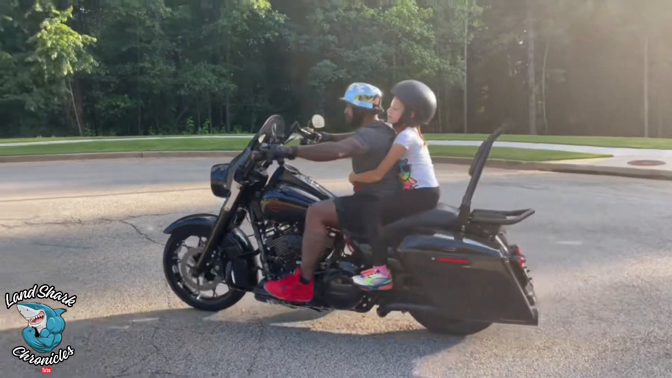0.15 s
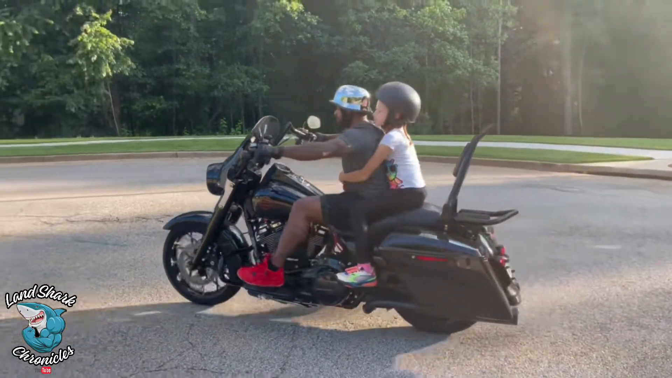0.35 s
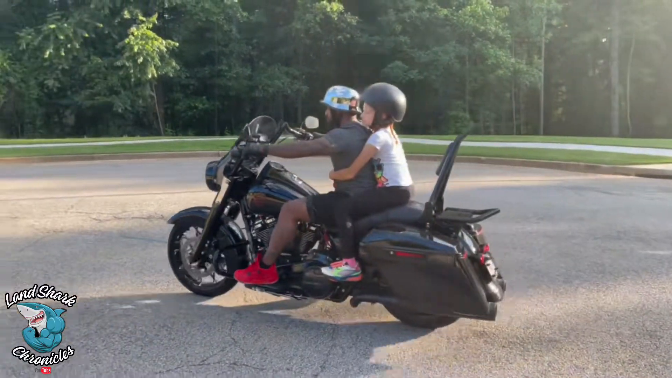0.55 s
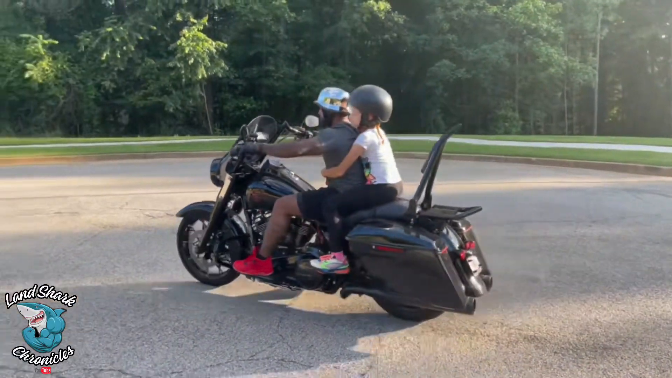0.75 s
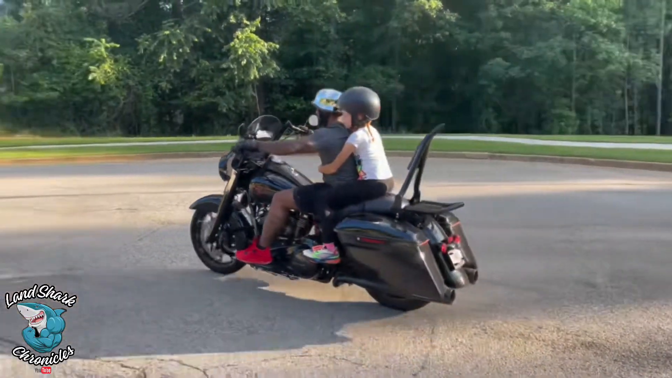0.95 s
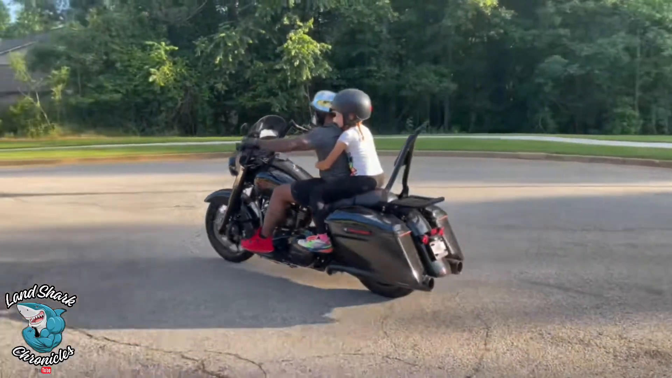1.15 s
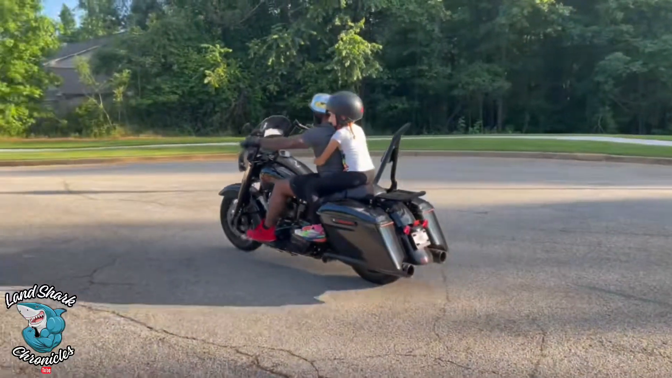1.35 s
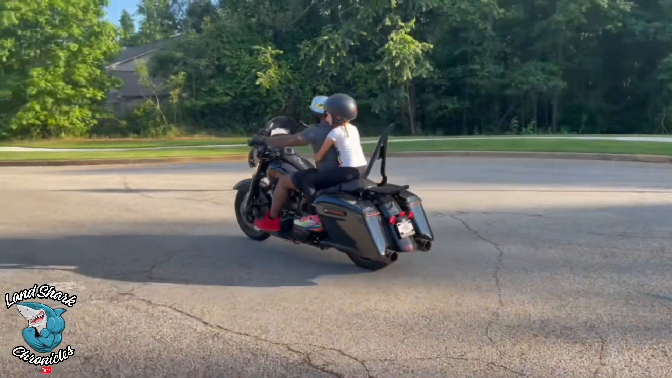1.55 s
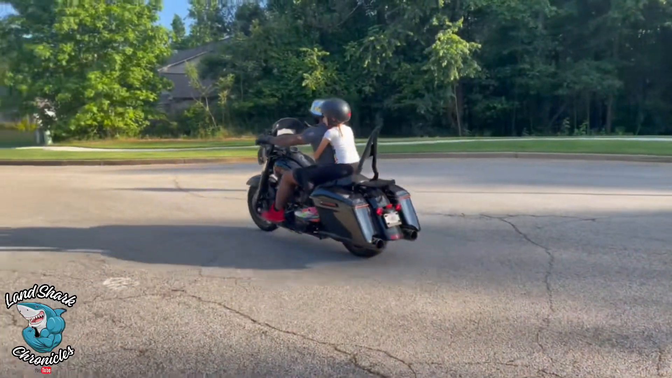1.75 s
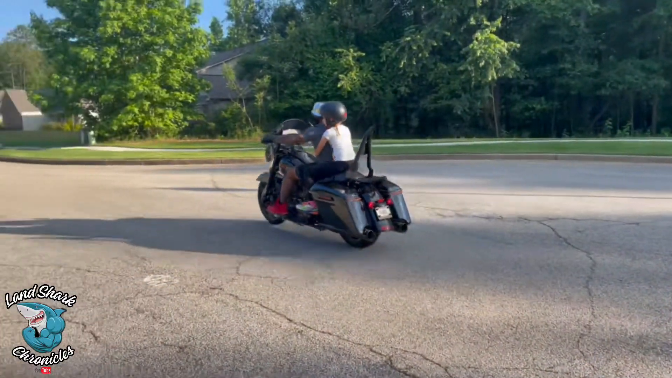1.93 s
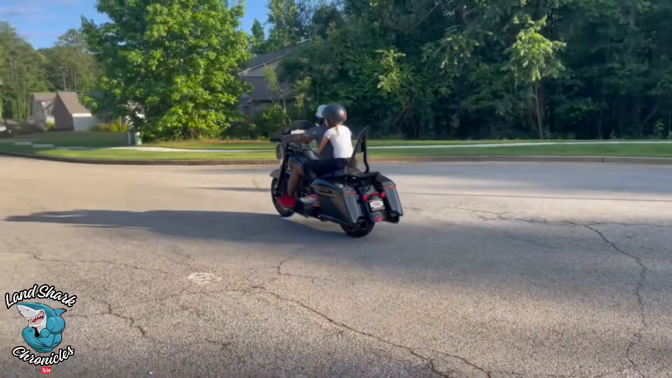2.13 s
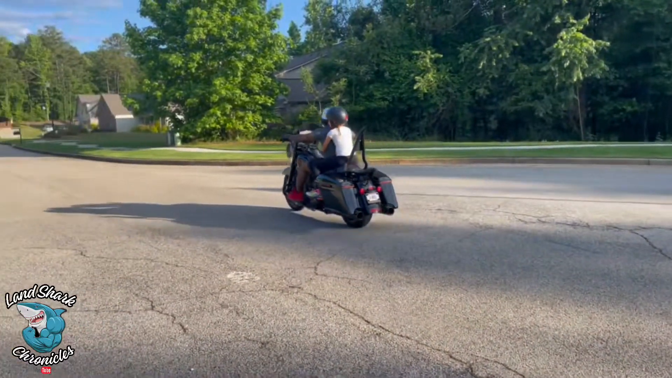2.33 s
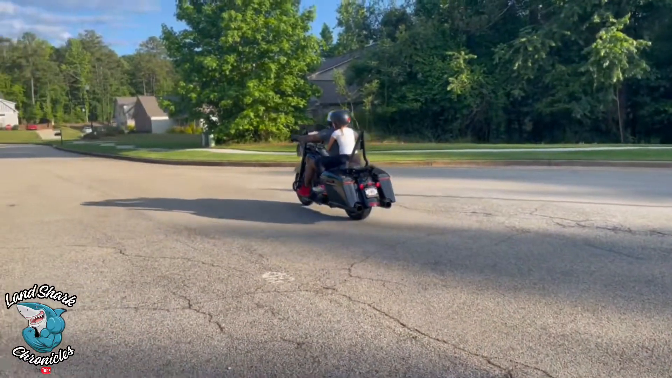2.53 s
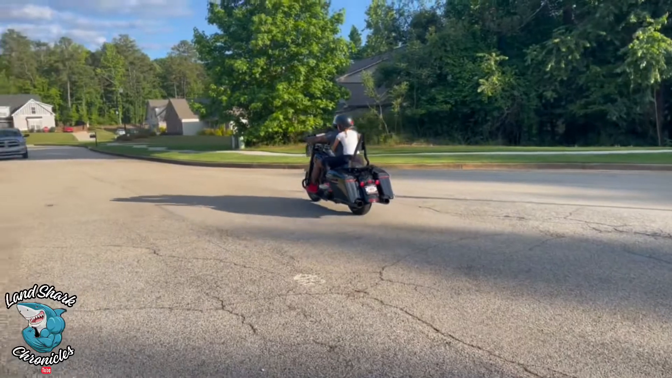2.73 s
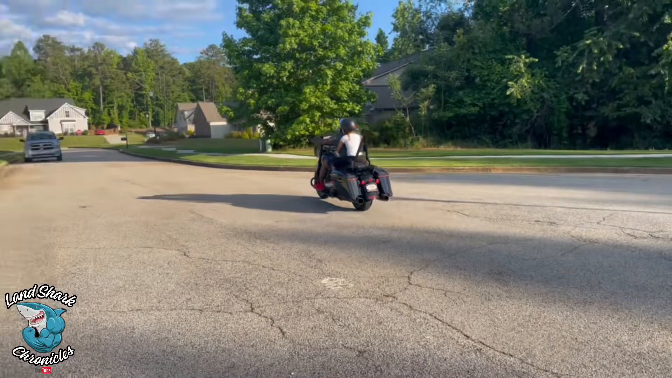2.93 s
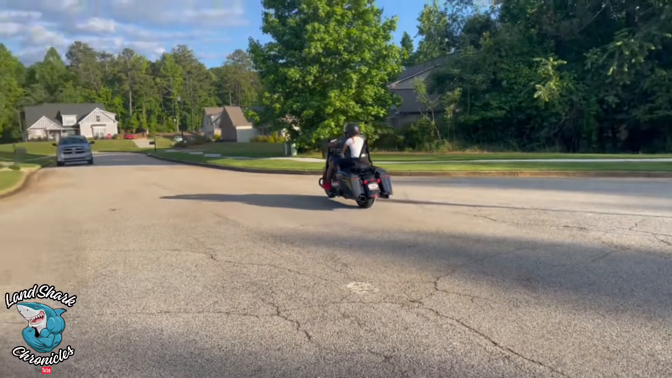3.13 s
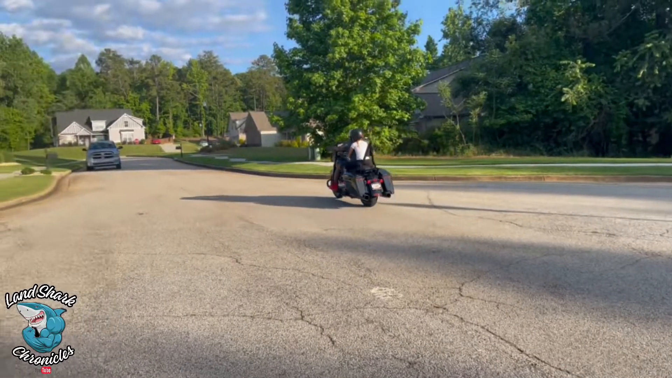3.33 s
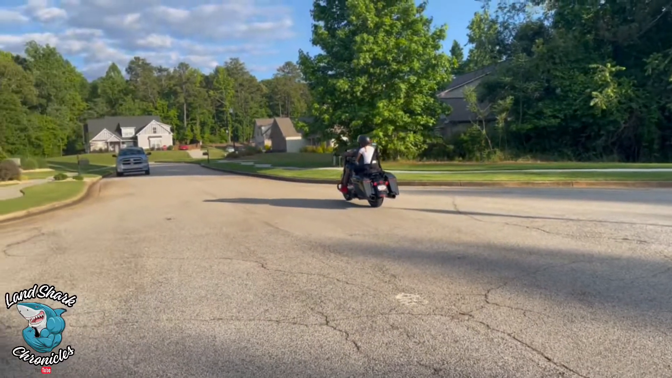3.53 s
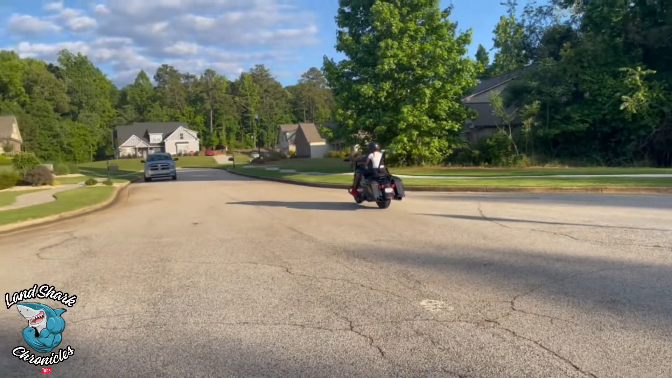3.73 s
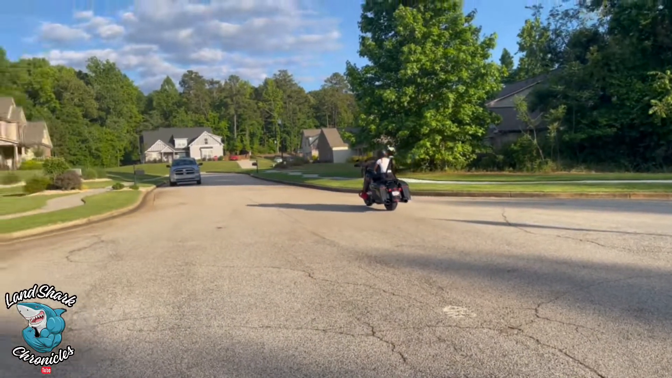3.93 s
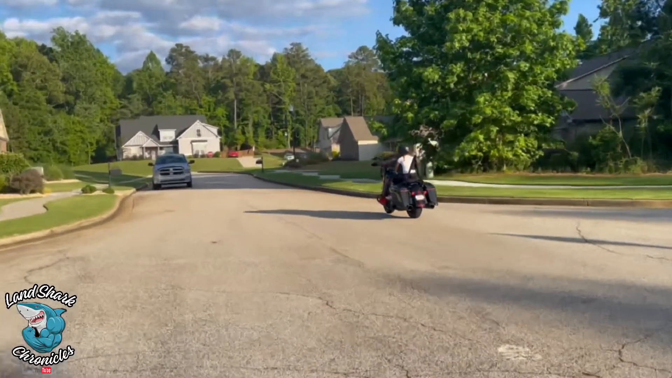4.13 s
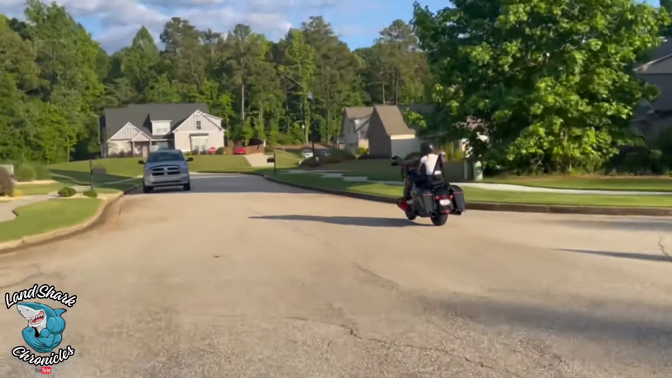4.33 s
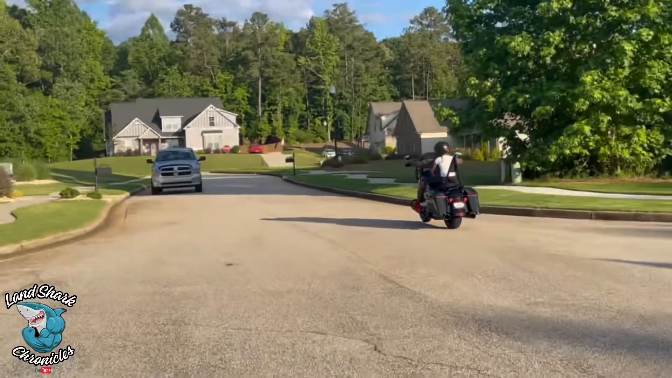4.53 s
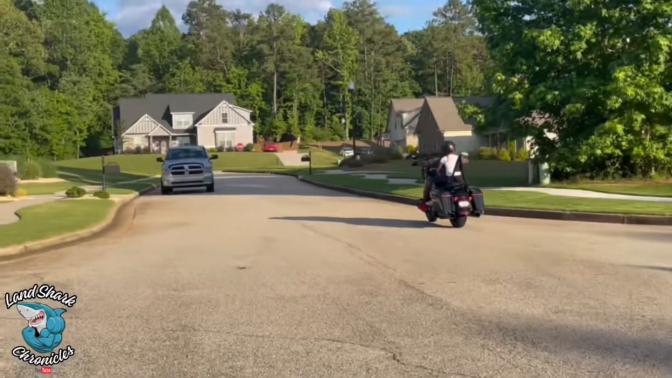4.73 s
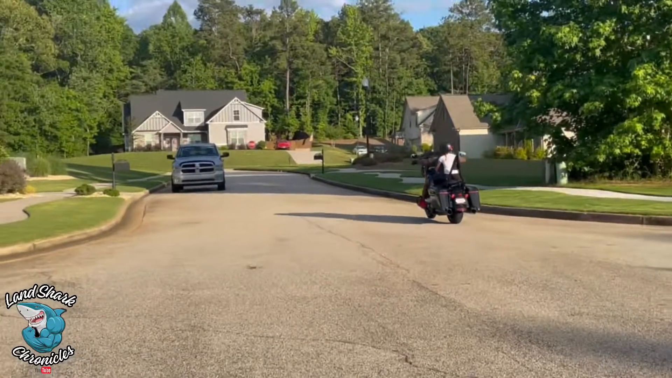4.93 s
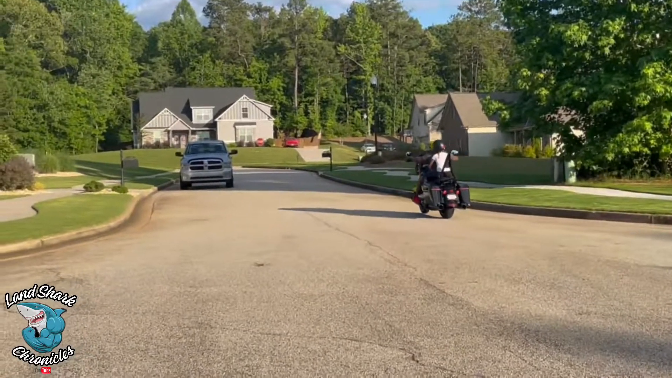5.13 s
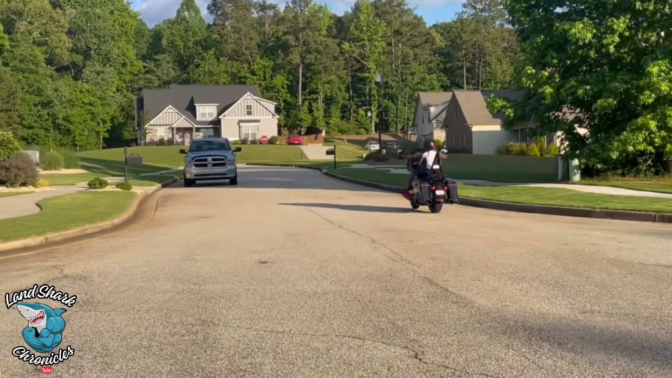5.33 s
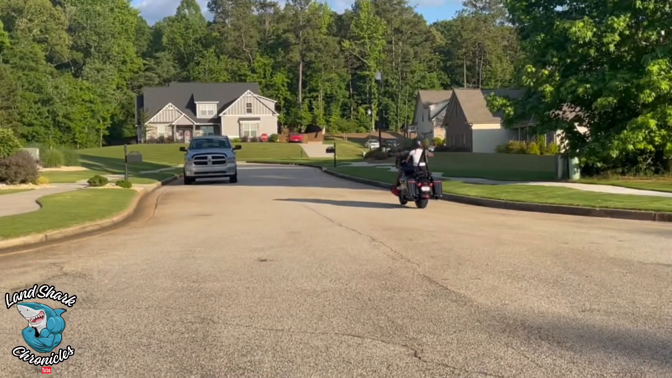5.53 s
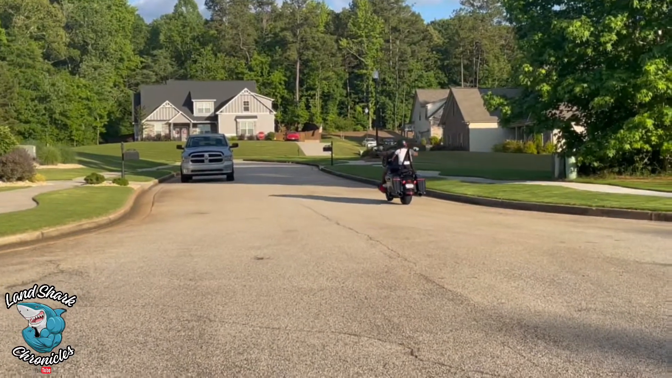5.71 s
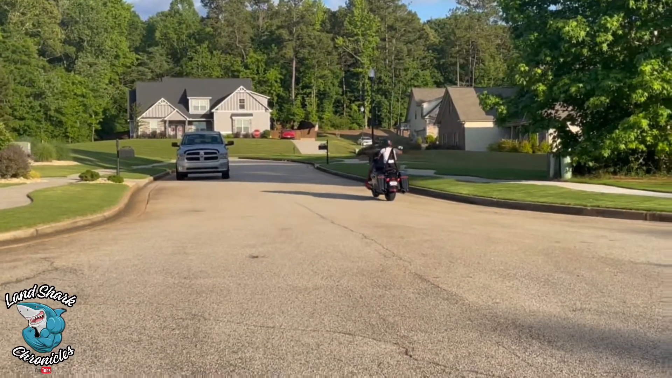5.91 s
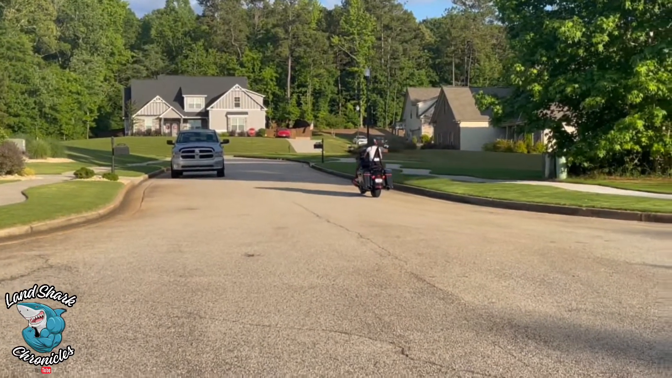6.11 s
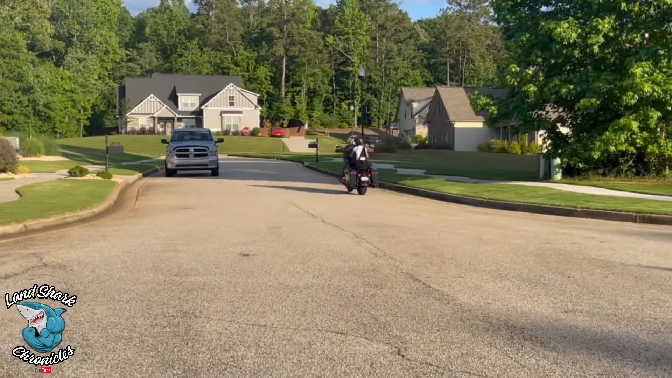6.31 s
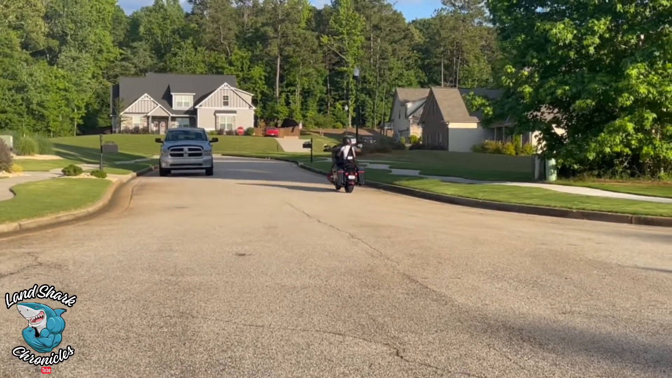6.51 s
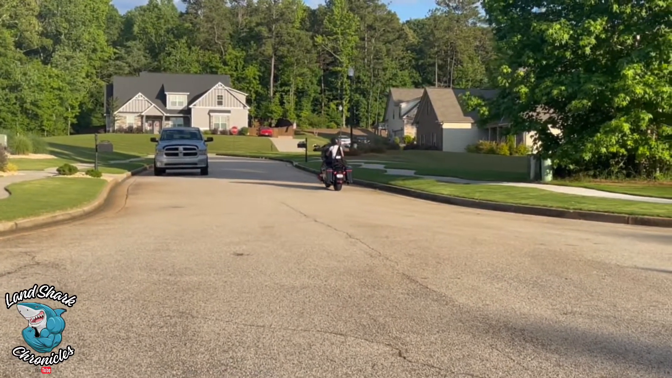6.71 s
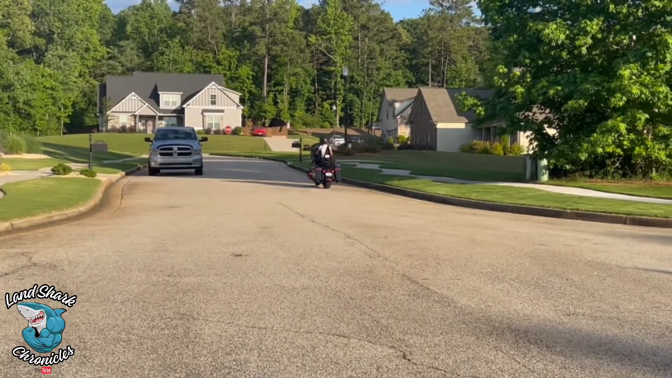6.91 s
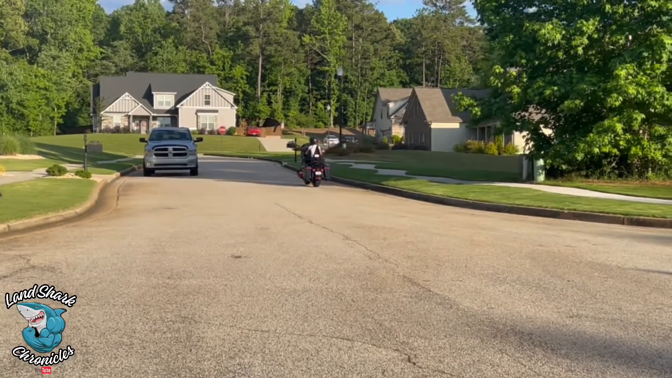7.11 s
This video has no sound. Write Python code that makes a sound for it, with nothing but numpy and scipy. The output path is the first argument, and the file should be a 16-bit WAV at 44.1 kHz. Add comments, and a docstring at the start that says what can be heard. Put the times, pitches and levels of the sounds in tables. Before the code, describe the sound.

Outdoors on a quiet tree-lined street, a stationary microphone hears a heavy twin-cylinder motorcycle loping close by, bassy with bright puffs of exhaust. Revs climb steadily as it rides off, growing quieter and duller, with light tyre hiss and faint gear whine. A dry rising bird trill emerges late. Around six seconds the engine drops off, clatters through a shift, and barks twice, far away.

```python
"""A big V-twin motorcycle idles a few metres away, pulls off down a street and shuts the throttle to change gear.
Impulses in uneven pairs, one per firing, drive pipe echoes and noise bursts: deep thump, bark and sharp chuff.
The road reflects the chuffs; with the clutch in, the beat softens to a drone and the gearbox clatters.
Distance, revs and throttle set the level of most engine layers by one law.
Trees answer with fading noise echoes, and a small bird trills in rising whistles as the engine recedes."""
import sys
import numpy as np
from scipy import signal
from scipy.fft import rfft, irfft, next_fast_len
from scipy.io import wavfile
from scipy.ndimage import uniform_filter1d, minimum_filter1d, map_coordinates

SR = 44100
rng = np.random.default_rng(int(sys.argv[2]) if len(sys.argv) > 2 else 0)


def wav_out(sig):
    """Save sig, one row per channel (or a flat mono array), as 16-bit PCM at SR to the path in sys.argv[1]."""
    wavfile.write(sys.argv[1], SR, np.round(np.clip(np.atleast_2d(sig).T, -1, 1) * 32767).astype(np.int16))


N = 315888
TIME = np.arange(N) / SR  # seconds


def amp(db):
    """Decibels to gain."""
    return 10 ** (np.asarray(db) / 20)


def unit(x):
    """Scale to rms 1."""
    return x / np.sqrt(np.mean(x ** 2) + 1e-20)


def along(points, hz):
    """Read a curve of (Hz, value) points on a log frequency axis."""
    f, v = np.transpose(points)
    return np.interp(np.log(hz + 1), np.log(f + 1), v)


def curves(rows):
    """One value per sample for each column after the time."""
    s, *cols = np.transpose(rows)
    return [np.interp(TIME, s, c) for c in cols]


def filtered(x, response):
    """Pass x through a filter given as a response to frequency."""
    m = next_fast_len(N + SR // 2)
    return irfft(rfft(x, m) * response(np.fft.rfftfreq(m, 1 / SR)), m)[..., :N]


def coloured(x, spectrum):
    """Shape x by (Hz, dB) points, at rms 1."""
    return unit(filtered(x, lambda hz: amp(along(spectrum, hz))))


def noise(spread):
    """Stereo white noise: a common part plus some of each side's own."""
    return unit(rng.standard_normal(N) + spread * rng.standard_normal((2, N)))


def resonances(hz, modes):
    """Each mode rings at its own pitch; a narrower one rings longer."""
    return sum(amp(db) * 1j * hz * w / (c * c - hz * hz + 1j * hz * w) for c, w, db in modes)


# Ringing of pipe walls and covers. Each row: pitch in Hz, width in Hz, gain in dB.
PANEL_MODES = [(460, 20, -33), (730, 33, -5.5), (1100, 63, -1.5), (2810, 85, -2.5), (3117, 140, -0.5)]


def ringing(hz):
    """Response of the pipe walls and covers, which ring at a few pitches."""
    return resonances(hz, PANEL_MODES)


def metal(x, spectrum):
    """Colour by a spectrum and by the narrow ringing of the metalwork."""
    return coloured(filtered(x, lambda hz: 1 + ringing(hz)), spectrum)


def mottled(x, patchy_db, size=5):
    """Turbulence gives every puff of gas its own colour: random patches in time and frequency."""
    z = signal.stft(x, nperseg=256)[2]
    field = uniform_filter1d(rng.standard_normal(z.shape[1:]), 2, axis=0)
    field = unit(uniform_filter1d(field, size, axis=1))
    return unit(signal.istft(z * amp(patchy_db * field), nperseg=256)[1][:, :N])


# How fast the engine turns. Each row: time in seconds, four-stroke cycles per second.
ENGINE_SPEED = [(0.0, 8.848), (0.492, 7.676), (0.884, 8.072), (1.484, 7.477), (1.717, 8.188),
                (1.939, 8.429), (2.555, 9.613), (3.592, 10.849), (4.463, 12.143), (5.854, 13.324),
                (6.2, 11.45), (6.42, 9.7), (6.6, 7.79), (6.78, 10.116), (6.95, 8.236), (7.16, 10.522)]
START_TURN, VEE_TURN = -.47, 315 / 720  # engine position at the start and the second cylinder's lag, in cycles


def firings(delay, second_db, scatter_db, jitter, second_lag=0, cylinders=(1, 1)):
    """One impulse per exhaust stroke; the second cylinder follows the first after 315 of 720 degrees."""
    speed, = curves(ENGINE_SPEED)
    turns = START_TURN + np.cumsum(speed) / SR
    cycle = np.arange(-1, int(turns[-1]) + 1)
    strokes = np.ravel([cycle, cycle + VEE_TURN], order='F')
    times = np.interp(strokes, turns, TIME, right=np.inf)
    # strokes before the start keep the starting speed
    times = times + np.minimum(strokes - START_TURN, 0) / speed[0]
    chance = rng.standard_normal((len(times), 2))
    size = amp(np.tile([0, second_db], len(cycle)) + scatter_db * chance[:, 0])
    # the faster the engine turns, the smaller each impulse
    size = size / np.sqrt(np.interp(times, TIME, speed))
    size = size * np.tile(cylinders, len(cycle))
    # second_lag is the extra delay of a pipe of another length
    times = times + delay + np.tile([0, second_lag], len(cycle)) + jitter * chance[:, 1]
    heard = (times > 0) & (times < TIME[-1])
    return np.bincount((times[heard] * SR).astype(int), size[heard], N)


def bursts(pulses, rise, decay):
    """Envelope of the gas let out by each pulse: a quick rise and a slower fall, at rms 1."""
    t = TIME[:SR // 8]
    puff = (1 - np.exp(-(t / rise) ** 2)) * np.exp(-t / decay)
    return unit(signal.fftconvolve(pulses, puff)[:N])


def pipe(x, round_trip, reflection):
    """Pressure waves run up and down the exhaust, weaker on each trip."""
    kept = np.clip(reflection, 0, .9)
    return filtered(x, lambda hz: 1 / (1 - kept * np.exp(-2j * np.pi * hz * round_trip)))


def silencer(x, smear, centre_hz):
    """The chambers hold low notes back longer than high ones, by smear seconds per centre_hz."""
    def phase(hz):
        return np.pi * smear / centre_hz * (np.minimum(hz, 3 * centre_hz) - centre_hz) ** 2
    return filtered(x, lambda hz: np.exp(1j * phase(hz)))


# How far away the motorcycle is. Each row: time in seconds, distance in metres.
DISTANCE = [(0, 4.86), (.7, 5.1), (1.2, 5.72), (1.8, 7.58), (2.5, 10.36), (3, 13.14), (3.6, 15.5),
            (4.1, 23.5), (5.2, 33.7), (7.16, 61.4)]


def road(x, reflection, scatter_hz=3800):
    """The bounce off the asphalt lags ever less with distance, so its comb of dips climbs in pitch."""
    distance, = curves(DISTANCE)
    pipe_height, ear_height, sound_speed = .3, 1.5, 343  # m, m, m/s
    lag = 2 * pipe_height * ear_height / distance / sound_speed
    bounce = np.array([map_coordinates(side, [(TIME - lag) * SR]) for side in x])
    # a steep bounce, close by, scatters the treble
    steep = np.clip((11.5 - distance) / 4, 0, .7)
    bounce = bounce - steep * filtered(bounce, lambda hz: 1 / (1 + (scatter_hz / (hz + 1)) ** 8))
    return (x + reflection * bounce) / np.sqrt(1 + reflection ** 2)


# Fed in to pull away, shut for the gear change, then opened twice.
# Each row: time in seconds, throttle from 0 (shut) to 1 (open).
THROTTLE_OPENING = [(.4, 0.18), (1, 0.51), (3.1, 1), (5.85, 0.69), (6.0, 0.3), (6.64, 0), (6.73, 0.97),
                    (6.91, 0.47), (7.05, .97), (7.16, 0.9)]
REF_M, REF_CYCLES = 10, 10  # distance in metres and cycles per second where a layer has its base level


def level(law):
    """Gain of a layer: it changes with each doubling of distance or revs, and as the throttle shuts.

    A law holds: base level in dB, dB lost per doubling of distance, dB gained per doubling
    of revs, dB lost with the throttle shut. A negative number turns the effect around."""
    base_db, distance_db, revs_db, shut_db = law
    distance, = curves(DISTANCE)
    speed, = curves(ENGINE_SPEED)
    throttle, = curves(THROTTLE_OPENING)
    db = base_db - distance_db * np.log2(distance / REF_M)
    db = db + revs_db * np.log2(speed / REF_CYCLES) - shut_db * (1 - throttle)
    return amp(db)


# Colour of the quiet background. Each row: pitch in Hz, relative level in dB.
AIR_COLOUR = [(25, 10), (100, 20), (400, 2.5), (1000, -11.5), (3000, -23), (6000, -13.5), (9000, -33),
              (11000, -62), (13000, -72)]


def background_air():
    """A faint, steady rush of coloured noise lies under everything."""
    return amp(-40) * coloured(noise(spread=.15), AIR_COLOUR)


# How long the trees answer. Each row: pitch in Hz, time to fade by 60 dB in seconds.
TREE_FADE = [(100, 0.76), (1000, 0.014), (4000, 0.0091), (12000, 0.0047)]


def trees(x):
    """Diffuse answer of the tree line: fading noise echoes, different on each side."""
    hz, t, z = signal.stft(rng.standard_normal((2, SR // 2)), SR, nperseg=256)
    tail = signal.istft(z * amp(-60 * t / along(TREE_FADE, hz)[:, None]), SR, nperseg=256)[1]
    # long waves reach both sides alike
    common = tail.mean(0)
    own = filtered(np.pad(tail - common, ((0, 0), (0, N))), lambda hz: hz / (hz + 900))
    tail = common + own[:, :tail.shape[1]]
    # the answer starts 1/40 s late
    late = np.pad(x, (SR // 40, 0))[None]
    return signal.fftconvolve(late, tail / np.linalg.norm(tail[0]), axes=1)[:, :N]


def bird(length=.024, low_hz=4800, high_hz=7400, level_db=-47.5):
    """A dry trill of quick, slightly husky upward whistles that swells at its start."""
    start, rate, husk = 4.813, 20.5, .03  # seconds, whistles per second, share of the pitch
    count, turn = np.divmod(np.maximum(TIME - start, 0) * rate, 1)
    chance = rng.standard_normal((int(count[-1]) + 1, 2))[count.astype(int)]
    sweep = np.minimum(turn / rate / length, 1)
    flutter = unit(uniform_filter1d(rng.standard_normal(N), size=40))
    hz = (low_hz + (high_hz - low_hz) * sweep) * (1 + 0.0089 * chance[:, 0] + husk * flutter)
    swell = np.clip((TIME - start) / 1.06, 0, 1)
    whistle = np.sin(np.pi * sweep) * np.sin(2 * np.pi * np.cumsum(hz) / SR)
    return amp(level_db + chance[:, 1]) * swell * whistle


TYRE_PEAK_S, TYRE_SWELL_S, TYRE_DB = 5.18, 1, -48.5
# Colour of the tyre hiss. Each row: pitch in Hz, relative level in dB.
TYRE_COLOUR = [(1000, 4.5), (2300, 0), (3600, -1), (5200, -3), (7000, -10.5), (9000, -11), (11500, -10),
               (13000, -45)]


def tyres():
    """Tyre hiss swells as the motorcycle gathers speed, then recedes: noise under one smooth hump."""
    swell = np.exp(-((TIME - TYRE_PEAK_S) / TYRE_SWELL_S) ** 2)
    return amp(TYRE_DB) * swell * coloured(noise(spread=0.074), TYRE_COLOUR)


# Level law of the whine: four numbers in dB, as told in level().
WHINE_LAW = (-53, 2.5, 15, 18)


def whine(order=170, width_hz=90):
    """The drive gears sing a fuzzy note, order times the cycle rate, that climbs with the revs."""
    speed, = curves(ENGINE_SPEED)
    fuzz = unit(filtered(noise(spread=0.11), lambda hz: 1 / (1 + (hz / width_hz) ** 2)))
    note = np.sin(2 * np.pi * order * np.cumsum(speed) / SR)
    return level(WHINE_LAW) * unit(fuzz * note)


# Gearbox and drive chain taking up slack. Each row: time in seconds, level in dB, length in seconds.
CLATTER_HITS = [(4.91, -48, 0.0064), (6.197, -42, 0.027), (6.79, -43.5, 0.018)]
# Colours of the machinery and its hiss. Each row: pitch in Hz, relative level in dB.
MACHINE_COLOUR = [(300, 6.5), (700, 3), (1100, 1.5), (1750, 3.5), (2300, -5.5), (2900, -4.5), (3600, -34),
                  (5000, -37), (9000, -38)]
HISS_COLOUR = [(1500, 8.5), (2800, 13), (4000, 11), (5500, 5.5), (7000, -3), (9000, 2.5), (11500, 7.5),
               (13000, 0.5)]
# Level laws of machinery, hiss and cover ring: four numbers in dB, as told in level().
MACHINE_LAW = (-37, 7.5, 9.5, -2)
HISS_LAW = (-48.5, 7, 13.5, -3.5)
COVER_LAW = (-58.5, 16, -7.5, 2.5)
COVER_HZ, COVER_WIDTH_HZ = 1750, 55  # the engine cover's ring


def machinery():
    """Valve gear and chain throb with the firings and ring a cover over a hiss; the drive clatters briefly."""
    strokes = firings(delay=-0.023, second_db=-.5, scatter_db=.7, jitter=0.003)
    whirr = unit(1 + 0.62 * bursts(strokes, rise=0.026, decay=0.015))
    clatter = sum(amp(db) * np.exp(-((TIME - s) / length) ** 2) for s, db, length in CLATTER_HITS)
    gears = road(metal(noise(spread=0.29), MACHINE_COLOUR), reflection=0.22)
    gears = gears * np.hypot(level(MACHINE_LAW) * whirr, clatter)
    cover = noise(spread=0.31) * whirr
    cover = unit(filtered(cover, lambda hz: 1 / (1 + ((hz - COVER_HZ) / COVER_WIDTH_HZ) ** 2)))
    hiss = coloured(noise(spread=0.41), HISS_COLOUR)
    # distance takes the top off the hiss
    far = np.clip((curves(DISTANCE)[0] - 15) / 22, 0, 1)
    hiss = hiss - far * filtered(hiss, lambda hz: 1 / (1 + (8500 / (hz + 1)) ** 8))
    return gears + level(COVER_LAW) * cover + np.hypot(level(HISS_LAW), amp(-5) * clatter) * hiss


SHIELD_HZ, SHIELD_WIDTH_HZ = 2850, 56
# Level law of the heat shield: four numbers in dB, as told in level().
SHIELD_LAW = (-69, -0.5, 1, 0)


def shield():
    """The heat shield keeps up a faint, thin ring: noise in a narrow band."""
    ring = filtered(noise(spread=.2), lambda hz: 1 / (1 + ((hz - SHIELD_HZ) / SHIELD_WIDTH_HZ) ** 2))
    return level(SHIELD_LAW) * unit(ring)


# Level law of the ticks: four numbers in dB, as told in level().
TICK_LAW = (-55.5, 1.5, 19, 11.5)
# Colour of the ticks. Each row: pitch in Hz, relative level in dB.
TICK_COLOUR = [(1500, -21), (2400, -13), (3000, -2.5), (3900, -12), (5100, -1.5), (6300, -7.5),
               (8000, -12.5), (12000, -41)]


def ticks():
    """A small metallic tick with every firing, weaker for the second cylinder; it carries far."""
    blows = firings(delay=-.002, second_db=-4.5, scatter_db=1.5, jitter=.0002)
    burst = noise(spread=0.07) * bursts(blows, rise=0.0027, decay=0.003)
    return level(TICK_LAW) * metal(burst, TICK_COLOUR)


# Level law of the clang: four numbers in dB, as told in level().
CLANG_LAW = (-44.5, 3.5, 6, 21)
# Ringing of the struck pipe walls. Each row: pitch in Hz, width in Hz, gain in dB.
CLANG_MODES = [(481, 27, 1.3), (724, 68, 1.1)]


def clang():
    """With the throttle open each firing hits hard enough to ring the pipe walls."""
    blows = firings(delay=-0.004, second_db=-7.5, scatter_db=-0.5, jitter=0.00024)
    ring = filtered(blows, lambda hz: resonances(hz, CLANG_MODES) * hz / (hz + 400))
    return level(CLANG_LAW) * unit(filtered(ring, lambda hz: 1 / (1 + (hz / 1200) ** 4)))


# Throat of the mufflers. Each row: pitch in Hz, width in Hz, gain in dB.
THROAT_BANDS = [(1380, 150, -5.5), (1530, 57, -11), (1755, 50, 2)]
# Level law of the throat: four numbers in dB, as told in level().
THROAT_LAW = (-49.5, 13.5, 10.5, 1)


def throat():
    """Close by, every puff rasps in the throat of the mufflers: noise bursts in a few hollow bands."""
    blows = firings(delay=-.002, second_db=0, scatter_db=1, jitter=.0004, second_lag=.001)
    gate = bursts(blows, rise=.003, decay=.013)

    def hollow(hz):
        return sum(amp(db) / (1 + ((hz - centre) / width) ** 2) for centre, width, db in THROAT_BANDS)
    return level(THROAT_LAW) * unit(filtered(noise(spread=0.24) * gate, hollow))


# Level law of the pops: four numbers in dB, as told in level().
POP_LAW = (-43.5, 10.5, 3.5, -4.5)
# Hollow notes of the header pipe.
# Each row: pitch in Hz, width in Hz, delay after the firing in seconds, relative level in dB.
POP_NOTES = [(490, 100, 0.0033, -10.5), (316, 24, .006, -7)]


def pops():
    """The exhaust valve cracks open with a short hollow pop; its lower note follows."""
    blows = firings(delay=0, second_db=-2.0, scatter_db=3.7, jitter=0.00016)
    notes = 0
    for centre, width, delay, db in POP_NOTES:
        note = filtered(blows, lambda hz: np.exp(-((hz - centre) / width) ** 2 - 2j * np.pi * hz * delay))
        notes = notes + amp(db) * unit(note)
    return level(POP_LAW) * notes


# Colour of the rasp. Each row: pitch in Hz, relative level in dB.
RASP_COLOUR = [(200, -4), (320, 5.5), (380, -9.5), (480, -14.5), (600, -3.5), (740, -1.5), (900, -18),
               (1300, -33), (3000, -19.5)]
# Level law of the rasp: four numbers in dB, as told in level().
RASP_LAW = (-34, 6, -1, 11)


def rasp():
    """Each firing knocks the pipe walls and lets out a long rush of rough gas."""
    blows = firings(delay=-.006, second_db=-1, scatter_db=.9, jitter=.0002)
    rush = metal(noise(spread=0.16) * bursts(blows, rise=0.00047, decay=0.021), RASP_COLOUR)
    knock = coloured(filtered(pipe(blows, round_trip=.0083, reflection=0.4), ringing), RASP_COLOUR)
    return level(RASP_LAW) * (amp(-5.5) * rush + amp(-17.5) * knock)


# Colours of the chuff and its treble spit. Each row: pitch in Hz, relative level in dB.
CHUFF_COLOUR = [(400, 5.5), (900, -5), (1400, 4.5), (1900, 13.5), (3200, 11), (4000, 5), (5500, -53),
                (8000, -34)]
SPIT_COLOUR = [(2500, -22), (4000, 1), (5000, 5), (6200, 4), (7500, -4.5), (9500, -7), (11500, -1.5),
               (13000, -16)]
# Level laws of chuff and spit: four numbers in dB, as told in level().
CHUFF_LAW = (-38, 6.5, -17.5, 27)
SPIT_LAW = (-40.5, 1.5, -22.5, 30.5)


def chuffs():
    """A bright chuff with a spit of treble opens every firing; it tightens with revs, and distance dulls it."""
    slow = firings(delay=-0.0052, second_db=-.5, scatter_db=.8, jitter=0.0004, second_lag=.001)
    slow = bursts(slow, rise=0.0028, decay=0.0056)
    quick = firings(delay=-0.0035, second_db=-3, scatter_db=1.3, jitter=0.0002, second_lag=-0.0012)
    quick = bursts(quick, rise=0.0023, decay=0.0036)
    revved = np.clip((curves(ENGINE_SPEED)[0] - 9.6) / 2, 0, 1)
    gate = (1 - revved) * slow + revved * quick
    chuff = level(CHUFF_LAW) * metal(mottled(noise(spread=0.3), patchy_db=4.5) * gate, CHUFF_COLOUR)
    spit = level(SPIT_LAW) * metal(mottled(noise(spread=0.58), patchy_db=4.5) * gate, SPIT_COLOUR)
    far = np.clip((curves(DISTANCE)[0] - 12) / 100, 0, 1)
    spit = spit - far * filtered(spit, lambda hz: 1 / (1 + (8800 / (hz + 1)) ** 8))
    # a second, weaker bounce by way of the saddlebags sharpens the comb
    return road(road(chuff + spit, reflection=.9), reflection=.4)


# Level of the bark. Each row: time in seconds, level in dB.
BARK_LEVEL = [(0, -47), (1.5, -48), (2.4, -42.5), (3.5, -48.5), (4.3, -48.5), (5.1, -49), (5.85, -46),
              (6.0, -58), (6.65, -58), (6.72, -45), (6.9, -56), (7.05, -46)]
BARK_HZ, BARK_WIDTH_HZ = 483, 167
# The two pipes. Each row: delay in seconds, relative level in dB, echo round trip in seconds,
# share reflected from 0 to 1.
BARK_ECHOES = [(.0035, 1.5, 0.00831, 0.35), (-.0004, -4.5, 0.012, 0.56)]


def bark():
    """Each firing gives a short, clean bark that echoes along its pipe."""
    out = np.zeros(N)
    for cylinder, (delay, db, round_trip, reflection) in enumerate(BARK_ECHOES):
        only = np.eye(2)[cylinder]
        blows = firings(delay, second_db=0, scatter_db=1, jitter=.0001, cylinders=only)
        out += amp(db) * pipe(blows, round_trip, reflection)
    band = filtered(out, lambda hz: np.exp(-((hz - BARK_HZ) / BARK_WIDTH_HZ) ** 2))
    return amp(curves(BARK_LEVEL)[0]) * unit(band)


def exhaust(spectra, pipes, cycles, climb, scatter_db, jitter):
    """Each cylinder sounds through its own pipe; its colour holds at the given cycles and climbs with revs."""
    speed, = curves(ENGINE_SPEED)
    steps = [.9, 1, 1.1]
    out = np.zeros(N)
    for cylinder, (delay, smear, round_trip, reflection) in enumerate(pipes):
        only = np.eye(2)[cylinder]
        blows = firings(delay, second_db=1.5, scatter_db=scatter_db, jitter=jitter, cylinders=only)
        wave = pipe(silencer(blows, smear, centre_hz=100), round_trip, reflection)
        colour = np.array(spectra)[:, [0, cylinder + 1]]
        # three copies with the colour slid down, kept and slid up, blended by the revs
        slid = filtered(wave, lambda hz: np.array([amp(along(colour, hz / step ** climb)) for step in steps]))
        for weight, copy in zip(np.eye(len(steps)), slid):
            out += np.interp(speed / cycles, steps, weight) * copy
    return out


# Level of the exhaust's bass. Each row: time in seconds, level in dB.
BOOM_LEVEL = [(0, -11), (1.5, -12), (3.05, -15), (3.83, -17.5), (4.33, -16), (4.83, -17.5), (5.46, -17.5),
              (5.85, -20), (6.1, -20), (6.35, -22.5), (6.68, -28), (6.78, -19.5), (6.94, -25.5),
              (7.16, -21.5)]
# Colour of the two pipes at idle, pulling away, at high revs and with the clutch in.
# Each row: pitch in Hz, first pipe's relative level in dB, second pipe's relative level in dB.
IDLE_COLOUR = [(30.4, -69, -13), (49, -38, -56), (56.4, -15.5, -13.5), (68.3, -7.5, -13), (83.6, -21, -26),
               (106, -11, -14), (114.8, -14.5, -6.5), (130, -14, -25.5), (161, -25, -32), (175, -22, -12.5),
               (200, -30, -37.5), (236, -31, -30.5), (256, -37, -34), (300, -34.5, -40.5), (370, -54, -51)]
PULL_COLOUR = [(30.0, -31, -48), (44.8, -20.5, -40), (56.5, -4.5, -7), (69.5, -8.5, -10),
               (79, -22.5, -15.5), (99.5, -19.5, -43), (114.8, -15.5, -6), (134, -23.5, -33.5),
               (171.5, -17.5, -33), (176.6, -22.5, -11.5), (196.6, -33.5, -29.5), (231, -26, -26.5),
               (264, -24, -52), (292, -49.5, -34), (380.0, -43, -47)]
REV_COLOUR = [(30.0, -49.0, -57), (44.8, -31.0, -14.5), (51.6, -27, -8), (69.6, -8.5, -10.5),
              (85, -6.5, -13.5), (99, -21, -20), (113, -31, -24.5), (133, -52, -17.0),
              (156.8, -17.5, -13.5), (178.6, -12, -37.5), (203.2, -44, -16), (230, -31, -23.5),
              (245, -24.5, -18), (297, -39, -32.5), (382, -35.5, -47)]
COAST_COLOUR = [(30, -33, -42), (48.4, -18, -19), (65, -7.5, -7), (77.8, -6, -6), (98, -24, -16.5),
                (113, -8.5, -13), (137, -27, -23), (160, -15, -19), (181, -17.5, -17), (215, -28.5, -30.5),
                (256, -26.5, -26.5), (310, -47, -53)]
# The two pipes in each of these states. Each row: delay in seconds, smear in seconds,
# echo round trip in seconds, share reflected from 0 to 1.
IDLE_ECHOES = [(.0222, .0125, .0277, .15), (.021, .0091, .0152, .36)]
PULL_ECHOES = [(.0205, .0081, .0277, .16), (.0197, .0197, .0105, .24)]
REV_ECHOES = [(.0207, .0087, .0275, .26), (.0187, .0133, .0163, .33)]
COAST_ECHOES = [(0.02043, .012, 0.0275, .3), (0.01997, 0.01705, .0163, 0.4)]
CLUTCH_S, CLUTCH_FADE_S = 5.88, .14  # when the clutch goes in and how long the fade to the drone lasts


def boom(low_hz=34, high_hz=345):
    """The deep beat of the pipes: loping at idle, steadier at higher revs, a soft drone once the clutch is in."""
    speed, = curves(ENGINE_SPEED)
    # 0 is idling, 1 pulling away, 2 high revs
    state = np.interp(speed, [8.0, 9.1, 10.6, 11.5], [0, 1, 1, 2])
    voices = [exhaust(IDLE_COLOUR, IDLE_ECHOES, cycles=8, climb=.11, scatter_db=.6, jitter=.0003),
              exhaust(PULL_COLOUR, PULL_ECHOES, cycles=10, climb=.32, scatter_db=.45, jitter=.00012),
              exhaust(REV_COLOUR, REV_ECHOES, cycles=12, climb=.8, scatter_db=.25, jitter=.00005)]
    beat = sum(np.maximum(1 - abs(state - k), 0) * voice for k, voice in enumerate(voices))
    drone = exhaust(COAST_COLOUR, COAST_ECHOES, cycles=10.6, climb=0.22, scatter_db=0.5, jitter=0.00082)
    clutch = np.clip((TIME - CLUTCH_S) / CLUTCH_FADE_S, 0, 1)
    beat = (1 - clutch) * beat + clutch * drone
    beat = filtered(beat, lambda hz: 1 / (1 + (low_hz / (hz + 1)) ** 4) / (1 + (hz / high_hz) ** 10))
    # even out the slow loudness so that the level table alone sets it
    power = uniform_filter1d(uniform_filter1d(beat ** 2, size=11025), size=8000)
    return amp(curves(BOOM_LEVEL)[0]) * beat / np.sqrt(abs(power) + 1e-20)


def scene():
    """The farther the motorcycle, the more of it comes back from the trees, which scatter little bass."""
    song = bird()
    pipes = boom() + bark() + chuffs() + rasp() + pops() + throat() + clang()
    bike = pipes + ticks() + shield() + machinery() + whine() + tyres()
    distance, = curves(DISTANCE)
    wet = amp(-9.5) * (distance / 30) ** .5
    answer = trees(filtered(bike.mean(0), lambda hz: hz ** 2 / (hz ** 2 + 160 ** 2)))
    return bike + wet * answer + song + amp(-28) * trees(song) + background_air()


# Left against right. Each row: pitch in Hz, left level minus right level in dB.
SIDE_TILT = [(60, 1.0), (110, 0.5), (200, -0.5), (360, -2.5), (650, -3.0), (1180, -4.5), (2140, -5.0),
             (3880, -2.5), (7050, 0.0), (12800, 0.0)]
# Each row: pitch in Hz, how far the left side leads in radians.
SIDE_LEAD = [(0, 0), (60, -.17), (115, -.32), (220, -.42), (470, -.38), (900, -.1), (1800, -.24),
             (2900, .8), (3900, .4), (4700, 1), (5500, -1.3), (6200, .5), (7000, -.8), (8700, -.2),
             (9700, -2.9), (11200, -4.8), (11700, -6.3)]
# Treble colour of both sides. Each row: pitch in Hz, gain in dB.
PORT_COLOUR = [(9000, 1), (9600, 7), (10150, -7.5), (10700, 4), (11400, 2.5), (12200, -6), (13000, -21)]
TOP_HZ = 13300  # nothing is kept from this pitch up


def record(dry):
    """Two ports with their own level and phase and an uneven treble, then a peak limiter and a band limit."""
    sides = np.array([[.5], [-.5]])  # each side takes half of the left-right difference

    def port(hz):
        gain = amp(along(PORT_COLOUR, hz) + sides * along(SIDE_TILT, hz))
        return gain * np.exp(1j * sides * along(SIDE_LEAD, hz))
    x = filtered(dry, port)
    needed = np.minimum(1, .92 / (np.abs(x).max(0) + 1e-9))
    gain = uniform_filter1d(minimum_filter1d(needed, size=441), size=441)
    return filtered(x * gain, lambda hz: hz < TOP_HZ)


dry = scene()
out = record(dry)
wav_out(out)
```